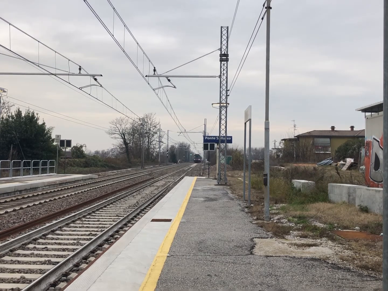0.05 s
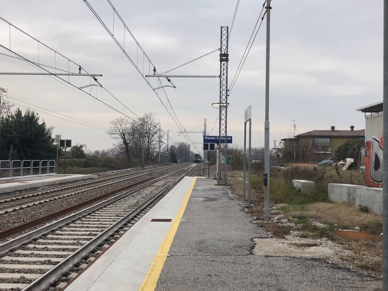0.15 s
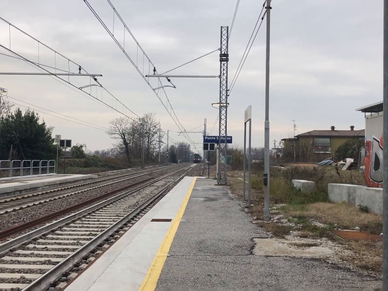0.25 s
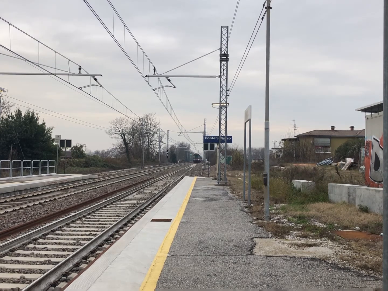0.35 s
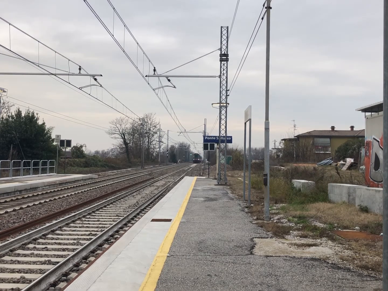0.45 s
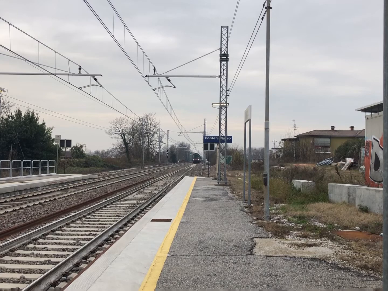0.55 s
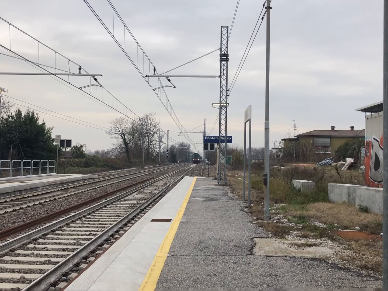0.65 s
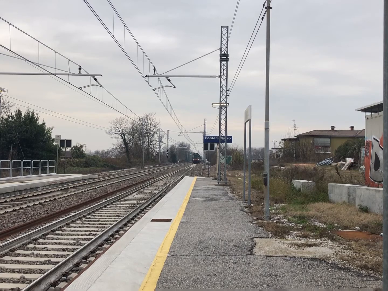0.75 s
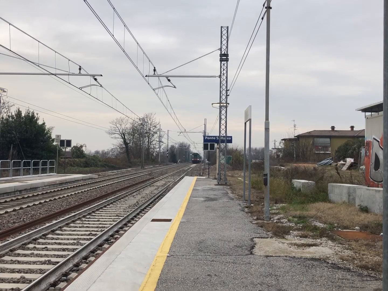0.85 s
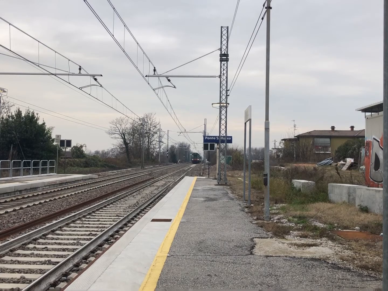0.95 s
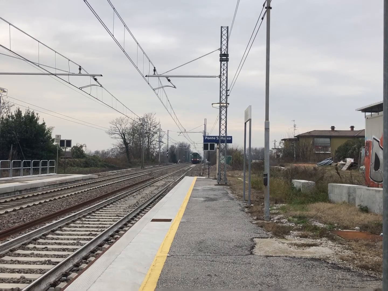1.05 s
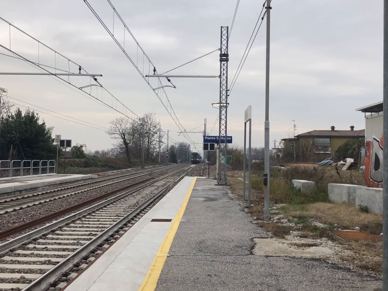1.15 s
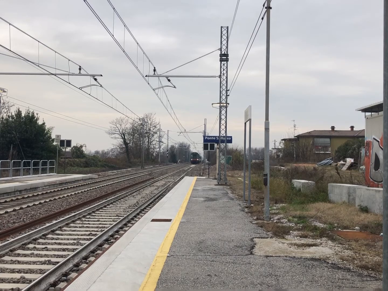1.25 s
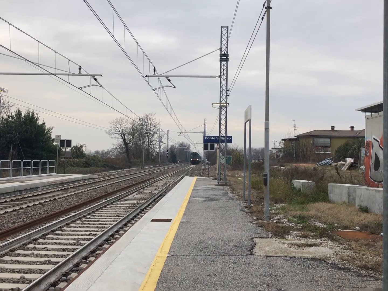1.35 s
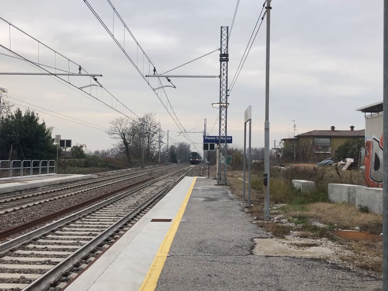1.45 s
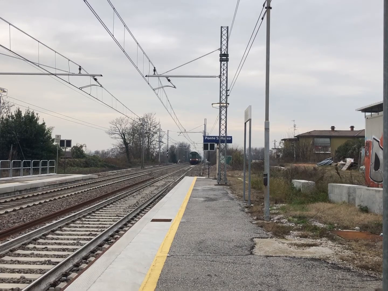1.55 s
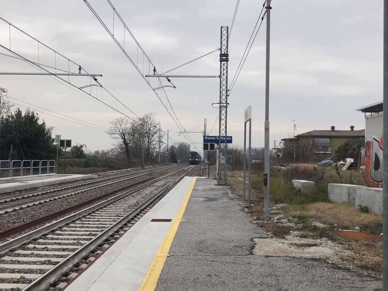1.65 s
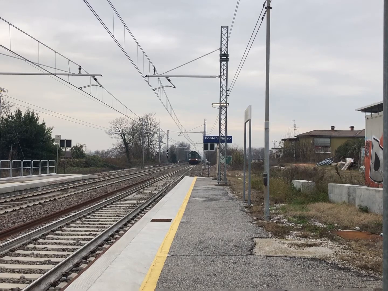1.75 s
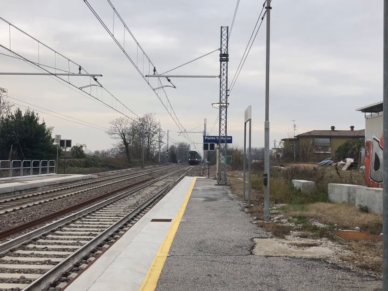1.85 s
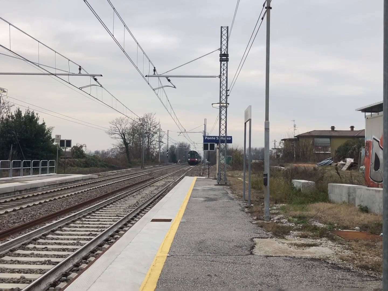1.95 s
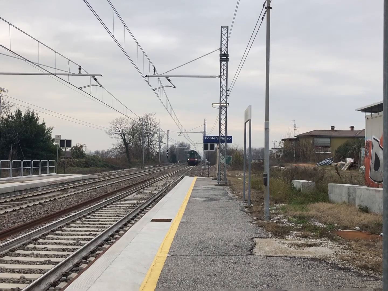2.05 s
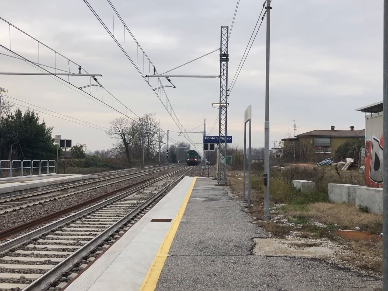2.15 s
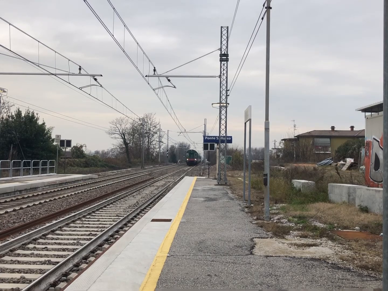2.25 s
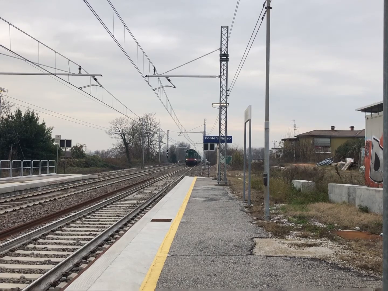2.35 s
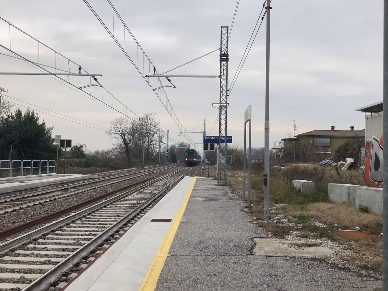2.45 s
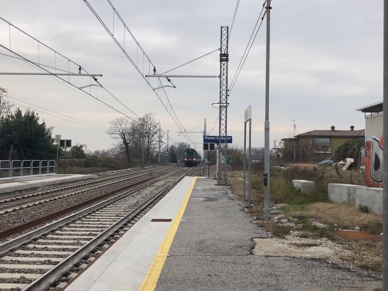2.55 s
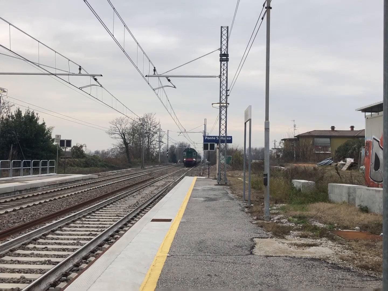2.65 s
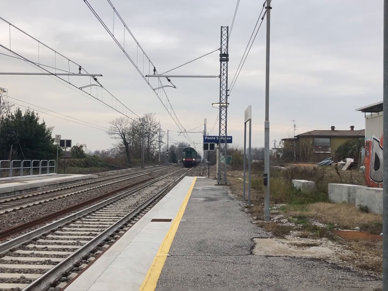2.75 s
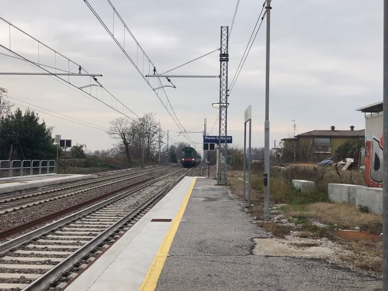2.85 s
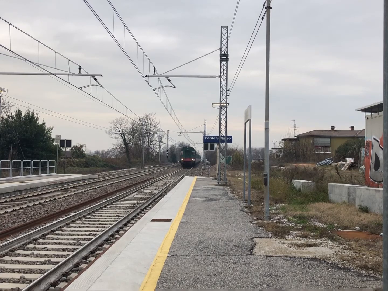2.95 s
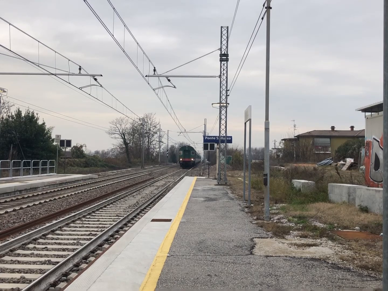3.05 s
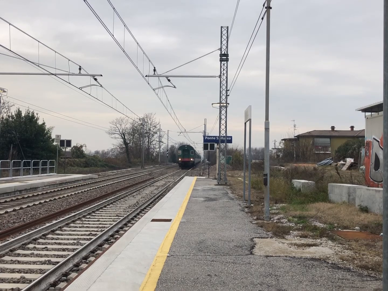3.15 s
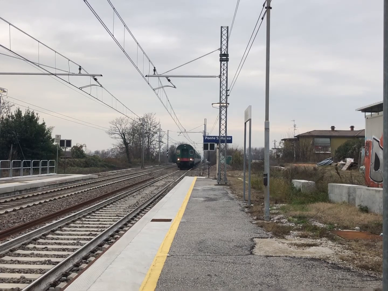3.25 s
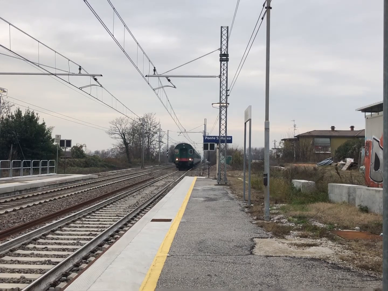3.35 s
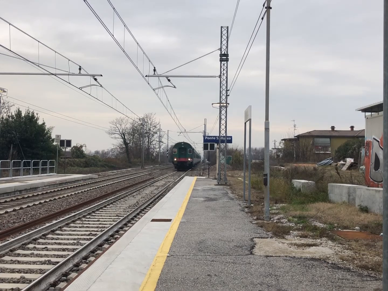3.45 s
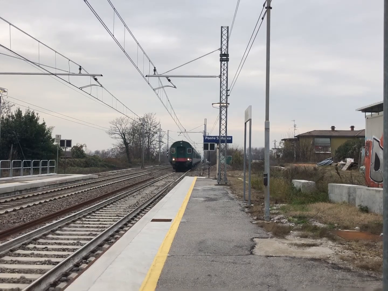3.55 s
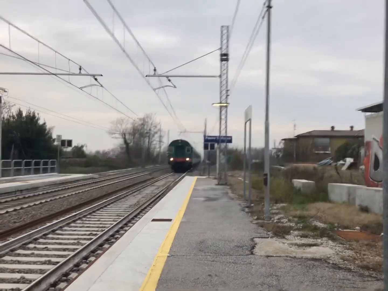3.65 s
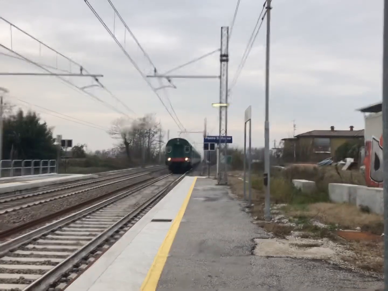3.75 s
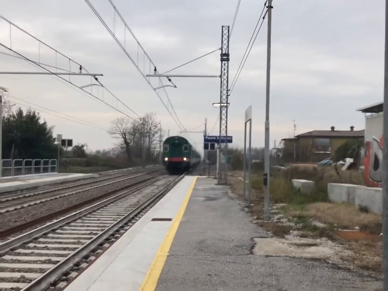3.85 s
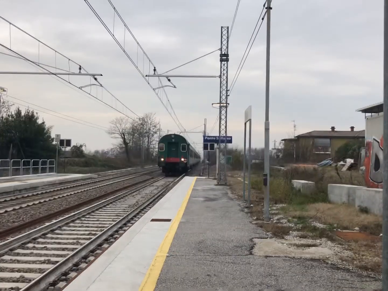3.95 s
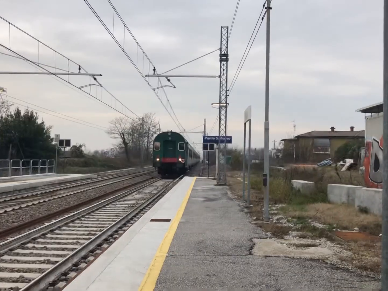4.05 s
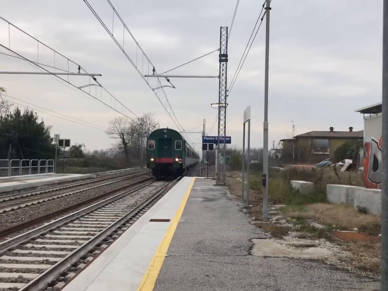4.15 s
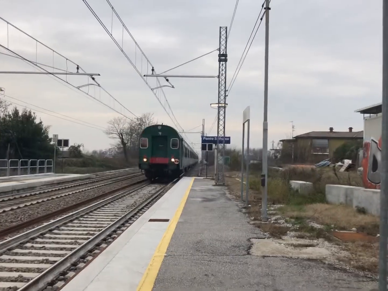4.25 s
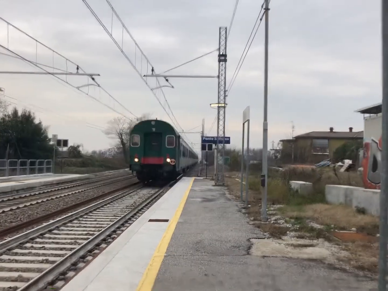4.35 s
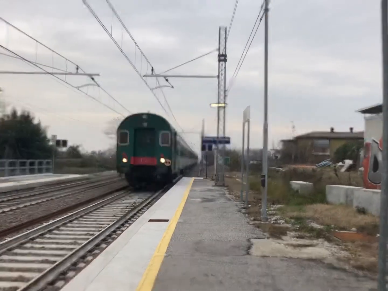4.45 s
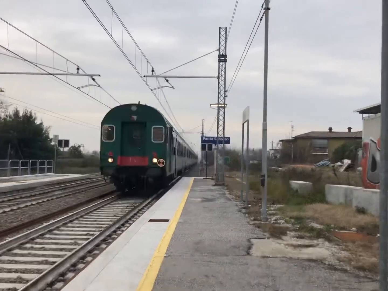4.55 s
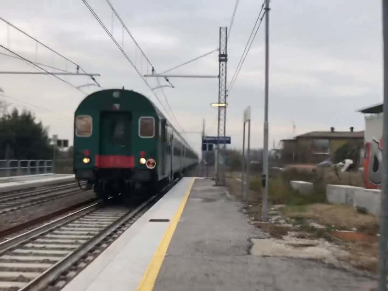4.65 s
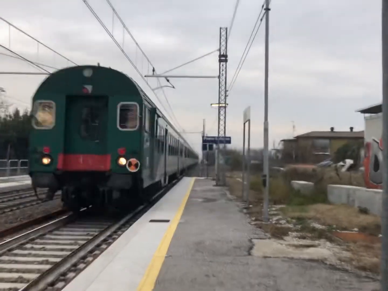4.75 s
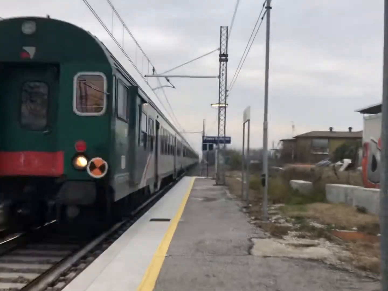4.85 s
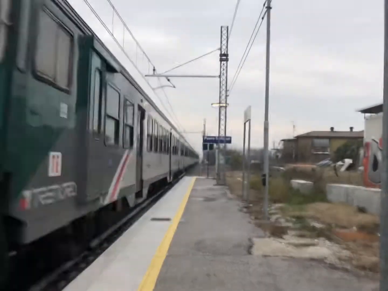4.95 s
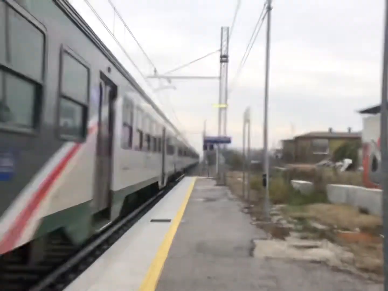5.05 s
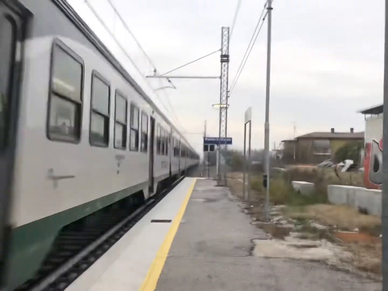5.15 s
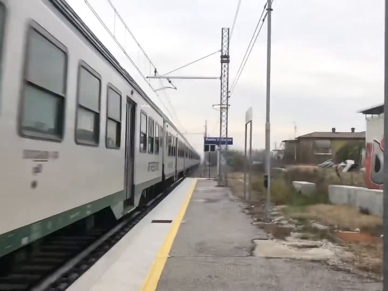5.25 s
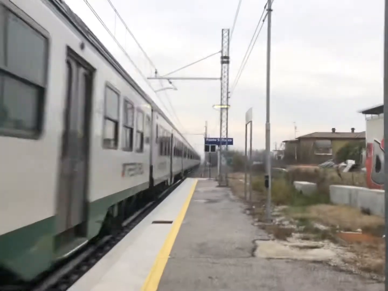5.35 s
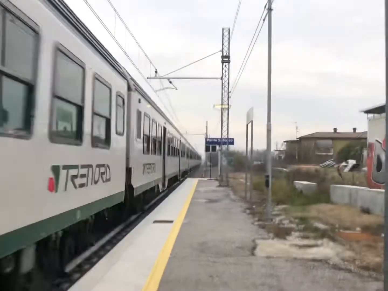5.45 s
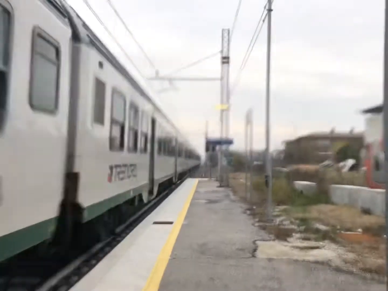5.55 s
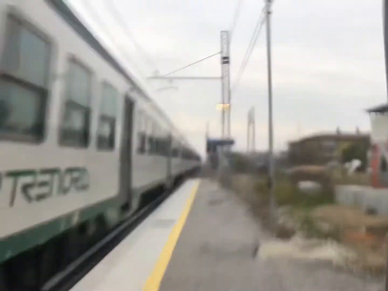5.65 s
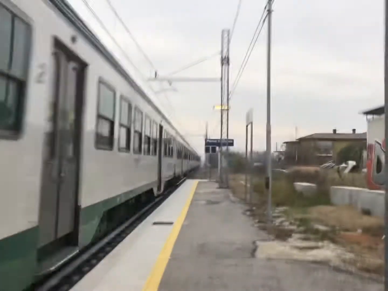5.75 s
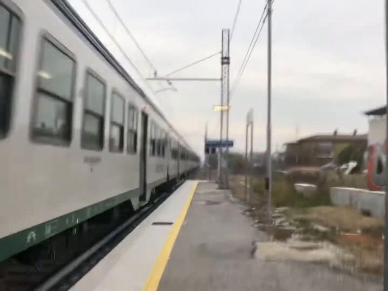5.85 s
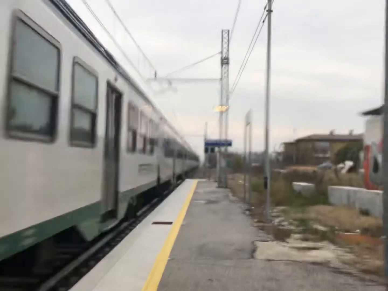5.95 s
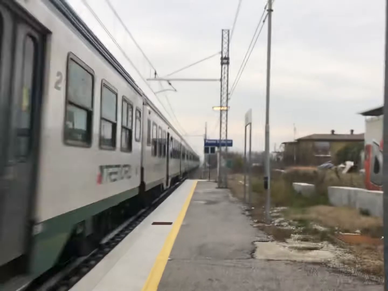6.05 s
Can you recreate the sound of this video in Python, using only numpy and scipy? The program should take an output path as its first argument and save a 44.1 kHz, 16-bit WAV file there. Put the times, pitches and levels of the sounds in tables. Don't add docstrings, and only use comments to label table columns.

```python
import sys
import numpy as np
from scipy import signal
from scipy.fft import rfft, irfft, next_fast_len
from scipy.io import wavfile
from scipy.ndimage import uniform_filter1d, minimum_filter1d, map_coordinates

SR = 44100
rng = np.random.default_rng(int(sys.argv[2]) if len(sys.argv) > 2 else 0)


def attenuation_scalar(level_db):
    decades = np.asarray(level_db, float) / 20
    return 10 ** decades


def wrap_up_sound(samples):
    columns = np.atleast_2d(samples).T
    tamed = np.clip(columns, -1, 1)
    steps = np.round(tamed * 32767).astype(np.int16)
    wavfile.write(sys.argv[1], SR, steps)


N = 269010

SPEED_MPS, ARRIVES_S, BESIDE_M = 30.7, 4.937, 4.11

# (time [s], level [dB])
GAIN_CONTROL = [(4.904, -1), (4.935, -10), (4.954, -3.5), (5, -9), (5.12, -8), (5.208, -11), (5.24, -7),
                (5.36, -7.5), (5.428, -5), (5.46, -15), (5.906, -24), (6.1, -18)]
# (frequency [Hz], level [dB per Hz])
TOWN_COLOUR = [(35, -8), (60, -2), (129, -6.5), (226, -15), (433, -13), (629, -19.5), (674, -20),
               (2160, -27), (2310, -19.5), (4980, -28.5), (6900, -74.5), (9330, -69), (15600, -45)]
# (frequency [Hz], width [Hz], level [dB])
LINE_WHISTLE = [(9610, 50, 0), (9900, 250, -28)]
# (frequency [Hz], level [dB per Hz])
DRONE_COLOUR = [(15, -50), (32, -30), (42, -7), (55, 6), (100, 4), (150, -13.5), (300, -54)]
# (time [s], swell [dB])
DRONE_SURGES = [
    (.6, 4),
    (1.6, 2.5),
    (2.1, 4.1),
    (3.1, 3),
    (4.2, 3.6),
    (4.95, 8.6),
]
# (time [s], frequency [Hz], level [dB])
MOTOR_HUM = [(2.4, 860, -77), (2.9, 854, -52), (3.5, 856, -46.5), (4, 853, -40), (4.3, 850, -35),
             (4.6, 870, -70)]
# (time [s], level [dB])
GEAR_SWELL = [(3.8, -77), (4.3, -40), (4.82, -22.5), (4.93, -35), (5, -25), (5.1, -19), (5.3, -32),
              (5.45, -23.5), (5.5, -60)]
# (time [s], peak [dB], ring frequency [Hz])
JOINT_KNOCKS = [
    (4.073, -11.5, 1140),
    (4.11, -10, 1166),
    (4.156, -13, 1042),
    (4.267, -10, 923),
    (4.28, -1.5, 1030),
    (4.332, -2, 1003),
    (4.348, -10, 1047),
    (4.394, -8, 827),
]
# (frequency [Hz], width [Hz], level [dB])
RAIL_MODES = [(925, 15, -5), (1000, 30, -6), (1045, 25, -3), (1140, 25, 0), (1205, 30, -.5), (1240, 20, -3),
              (1287, 25, 0), (1320, 20, -3), (1360, 12, 5), (1430, 12, -5), (2050, 30, -9)]
# (frequency [Hz], width [Hz], level [dB])
RAIL_LOW_MODES = [(630, 20, -9), (1047, 14, 0), (1133, 12, 2)]
# (frequency [Hz], width [Hz], level [dB])
RAIL_HEAD_MODES = [(5780, 200, 0), (7640, 150, -6), (10750, 120, -11), (11050, 400, -7), (11550, 200, -10),
                   (12330, 100, -8), (12560, 90, -3), (12790, 90, 0), (13020, 90, -3), (13600, 800, -8),
                   (14300, 100, -5), (14560, 90, -1), (14800, 120, 0), (15480, 250, -4)]
# (time [s], swell [dB], swell of the lower modes [dB])
SONG_THROBS = [(0, 6, 5), (.75, 3.5, 9.5), (1.6, 3.5, 11), (2, 3, -3), (2.3, -2, 6), (2.6, 1.5, -6),
               (2.95, -2.5, 6), (3.35, 2.5, -9), (4, -3, 1), (4.15, 2, 9), (4.3, 4.5, -1), (4.5, -2, -7),
               (4.7, 14, 0)]
# (time [s], length [s], buffet [dB], flutter over the buffet [dB])
WIND_GUSTS = [
    (4.87, .02, -11, -14),
    (4.936, 0.11, -14, -5.5),
    (5.12, .095, -7.5, -3.5),
    (5.225, 0.027, -16.5, -7),
    (5.429, 0.046, -9, -4),
    (5.484, 0.12, -8.5, -11),
    (5.635, .04, -5.5, -17),
    (5.684, 0.099, -12.5, -10),
    (5.79, 0.094, -17, -4),
    (5.912, 0.038, -30, -18),
]
# (time [s], peak [dB], snap [dB])
PORT_EDDIES = [(4.919, 1.5, -20), (4.954, -9, -28), (5.005, -3, -29), (5.047, -5, -21.5), (5.066, -8, -25),
               (5.084, -8, -24), (5.12, 0, -29), (5.181, -8, -24), (5.192, -1, -30), (5.438, -2, -25),
               (5.456, -0.5, -19), (5.474, -3, -22), (5.51, -10, -26), (5.535, 4.5, -21), (5.561, -3, -25),
               (5.58, -11, -29), (5.607, -7.5, -26), (5.62, 3, -20), (5.646, -7.5, -21.5), (5.656, -4, -22),
               (5.687, -4, -24), (5.704, -6.5, -20.5), (5.723, 2, -19.5), (5.741, -0.5, -21),
               (5.764, -0.5, -27), (5.78, 1, -32), (5.802, -12.5, -40), (5.857, -7, -34), (5.88, -11, -40)]
# (frequency [Hz], level [dB per Hz])
BUFFET_COLOUR = [(12, -43), (20, -7.5), (92, 1), (248, -7.5), (334, -17.5), (372, -19), (443, -18.5),
                 (500, -17.5), (650, -63), (1100, -120)]
FLUTTER_COLOUR = [(180, -15.5), (300, 1.5), (334, -2), (566, -5), (826, -6), (1260, -12), (1560, -15),
                  (5000, -53.5), (6500, -58), (11000, -120)]
SNAP_COLOUR = [(800, -40), (2000, 5.5), (3000, 0.5), (5000, -13), (8000, -19), (14000, -29)]
# (frequency [Hz], width [Hz], level [dB])
WHEEL_MODES = [(1737, 167, 0), (1940, 175, 2), (2264, 254, -2), (2928, 140, -2.5), (3240, 800, -10)]
# (frequency [Hz], level [dB per Hz])
RUMBLE_COLOUR = [(65, -37), (110, -7.5), (172, -3), (220, -1.5), (399, -10), (646, -8.5), (966, -10.5),
                 (1170, -9), (1600, -15.5), (2080, -73), (3520, -120)]
HISS_NEAR = [(1470, -66), (2500, -1), (2730, 3.5), (2990, -7), (4250, -3.5), (6090, -3), (8000, -24.5),
             (10400, -47), (17600, -120)]
HISS_FAR_OFF = [(1470, -40), (2500, 8.5), (2890, 2), (3990, 4.5), (4370, 0), (5890, 0), (9000, -25.5),
                (11700, -46), (19800, -120)]
RUSH_NEAR = [(4120, -27), (7000, 1.5), (7590, -2), (11400, -4.5), (13000, -8), (15600, -6.5)]
RUSH_FAR_OFF = [(4120, -26), (7000, -0.5), (9500, -3.5), (11100, -4), (12200, -8), (14900, -17),
                (15600, -15)]
# (time [s], width [s], treble [dB], rumble [dB])
WALL_ECHOES = [
    (3.33, 0.082, 1, -1),
    (3.8, .12, 1, 1),
    (4.08, 0.14, 4, 4.5),
    (4.2, .04, 2, 1),
    (4.4, 0.11, 1, 4),
    (4.6, .08, 0, 3),
    (4.86, 0.043, 0, -2),
    (5.35, 0.085, -3.5, -2.5),
]


def unit(x):
    return x / np.sqrt(np.mean(x ** 2) + 1e-20)


def curves(rows):
    s, *columns = np.transpose(rows)
    return [np.interp(np.arange(N) / SR, s, column) for column in columns]


def swells(rows, width_s):
    s, *columns = np.transpose(rows)
    offset = np.arange(N) / SR - s[:, None]
    bells = np.exp(-(offset / np.reshape(width_s, (-1, 1))) ** 2)
    return [column @ bells for column in columns]


def wobble(rate):
    knots = rng.standard_normal(int(N * rate / SR) + 4)
    return map_coordinates(knots, [np.arange(N) * rate / SR])


def sloped(points):
    f, db = np.transpose(points)
    return lambda hz: attenuation_scalar(np.interp(np.log(hz + 1), np.log(f + 1), db))


def resonant(modes):
    def response(f):
        total = 0
        for k, (centre, width, db) in enumerate(modes):
            total = total + (-1) ** k * attenuation_scalar(db) * 1j * f * width / (centre * centre - f * f + 1j * f * width)
        return total
    return response


def peaked(modes):
    return lambda f: np.sqrt(sum(attenuation_scalar(2 * db) / (1 + np.abs(2 * (f - c) / w) ** 3.9) for c, w, db in modes))


def coloured(x, response):
    m = next_fast_len(N + 8192)
    return irfft(rfft(x, m) * response(np.fft.rfftfreq(m, 1 / SR)), m)[..., :N]


def noise(response, patchy_db):
    z = signal.stft(rng.standard_normal(N + 512), nperseg=512)[2]
    patches = uniform_filter1d(rng.standard_normal(z.shape), size=6, axis=0)
    patches = unit(uniform_filter1d(patches, size=10, axis=1))
    patchy = signal.istft(z * attenuation_scalar(patchy_db * patches), nperseg=512)[1][:N]
    return unit(coloured(patchy, response))


def evened(x, share, size):
    power = np.abs(uniform_filter1d(x ** 2, size=size) + .02)
    return unit(x / power ** (share / 2))


def heard(db_at_60m, growth, loss_db_per_m):
    ahead = SPEED_MPS * np.clip(ARRIVES_S - np.arange(N) / SR, 0, None)
    r = np.hypot(ahead, BESIDE_M)
    return db_at_60m - growth * 20 * np.log10(r / 60) - loss_db_per_m * (r - 60) + curves(GAIN_CONTROL)[0]


def town():
    return attenuation_scalar(-49.0 + 0.39 * wobble(5.12)) * noise(sloped(TOWN_COLOUR), patchy_db=1.5)


def overhead_line():
    whistle = evened(noise(peaked(LINE_WHISTLE), patchy_db=0.0), share=0.46, size=1500)
    rise_db = 1.3 * np.arange(N) / SR
    return attenuation_scalar(-68 + rise_db + 2.5 * wobble(30.1) + curves(GAIN_CONTROL)[0]) * whistle


def ground_drone():
    level_db = heard(-40.5, growth=0.62, loss_db_per_m=0.11) + swells(DRONE_SURGES, width_s=0.13)[0]
    return attenuation_scalar(level_db) * evened(noise(sloped(DRONE_COLOUR), patchy_db=1.0), share=.3, size=4000)


def motor_hum():
    hz, db = curves(MOTOR_HUM)
    turn = 2 * np.pi * np.cumsum(hz + 3 * wobble(20)) / SR
    return attenuation_scalar(db + 1.2 + 2.6 * wobble(14)) * np.sin(turn)


def gear_whine():
    gear_hz, level_s, beside_m, sound_mps = 1875, 4.99, 2.5, 343
    ahead = SPEED_MPS * (level_s - np.arange(N) / SR)
    hz = gear_hz / (1 - SPEED_MPS * ahead / np.hypot(ahead, beside_m) / sound_mps)
    turn = 2 * np.pi * np.cumsum(hz) / SR
    band = wobble(260) * np.cos(turn) + wobble(260) * np.sin(turn)
    return attenuation_scalar(curves(GEAR_SWELL)[0]) * band


def rail_joint():
    out, t = np.zeros(N + SR), np.arange(SR // 10) / SR
    for s, db, hz in JOINT_KNOCKS:
        ring = np.sin(2 * np.pi * hz * t)
        ring += 0.35 * np.sin(2 * np.pi * 1.09 * hz * t)
        ring += 0.54 * np.sin(2 * np.pi * 0.76 * hz * t)
        fade = attenuation_scalar(db - 4.5 - 60 * t / 0.056)
        out[round(s * SR):][:len(t)] += fade * (1 - np.exp(-t / 0.003)) * ring
    return out[:N]


def singing_rails():
    handover_s, dies_db_per_s = 4.31, 47
    ahead_s = handover_s - np.arange(N) / SR
    throb_db, throb_low_db = swells(SONG_THROBS, width_s=0.09)
    carried_db = np.minimum(-0.16 * SPEED_MPS * ahead_s, dies_db_per_s * ahead_s)
    song_db = -31.5 + throb_db + carried_db
    low_db = -0.5 + throb_low_db - .11 * SPEED_MPS * np.clip(ahead_s, 0, None)

    def steep(hz):
        return resonant(RAIL_MODES)(hz) / (1 + (hz / 2300) ** 4) / (1 + (700 / (hz + 1)) ** 4)

    song = noise(steep, patchy_db=-1.0) + attenuation_scalar(low_db) * noise(resonant(RAIL_LOW_MODES), patchy_db=5.0)
    thin_db = -62.5 + 0.5 * (song_db - .7 * throb_db + 46.5) + 0.54 * wobble(20)
    thin = attenuation_scalar(thin_db) * noise(peaked(RAIL_HEAD_MODES), patchy_db=0.5)
    return attenuation_scalar(song_db - 2.0 + 0.98 * wobble(22.14)) * song + thin


def slipstream():
    start, length, push_db, over_db = np.transpose(WIND_GUSTS)
    since = np.arange(N) / SR - start[:, None]
    rise = np.clip(since / .02, 0, 1) ** 2
    shape = rise * attenuation_scalar(-598 * np.clip(since - length[:, None], 0, None))
    buffet = evened(noise(sloped(BUFFET_COLOUR), patchy_db=0.5), share=0.25, size=900)
    flutter = unit(attenuation_scalar(4.2 * wobble(260)) * noise(sloped(FLUTTER_COLOUR), patchy_db=3))
    gusts = attenuation_scalar(push_db + 1) @ shape * buffet
    gusts += attenuation_scalar(push_db + over_db - 1.0) @ shape * flutter

    t = np.arange(SR // 10) / SR

    def puff(rise_s):
        return (t / rise_s * np.exp(1 - t / rise_s)) ** 1.97

    tears, snaps = np.zeros(N + SR), np.zeros(N + SR)
    for s, db, snap_db in PORT_EDDIES:
        tears[round((s - .003) * SR):][:len(t)] += attenuation_scalar(db - 2.5) * puff(rise_s=0.0049)
        snaps[round(s * SR):][:len(t)] += attenuation_scalar(snap_db + 2.5) * puff(rise_s=0.0015)
    tear = evened(noise(sloped(FLUTTER_COLOUR), patchy_db=1), share=0.68, size=90)
    snap = evened(noise(sloped(SNAP_COLOUR), patchy_db=1), share=.7, size=60)
    return gusts + tears[:N] * tear + snaps[:N] * snap


def wheels():
    t = np.arange(N) / SR
    hidden = np.clip((2.725 - t) / .04 + .5, 0, 1)
    gap_start_s, gap_end_s, gap_db = 5.125, 5.25, -6.5
    gap = np.clip((t - gap_start_s) / .01, 0, 1) * np.clip((gap_end_s - t) / 0.064 + 1, 0, 1)
    behind = np.clip((t - gap_start_s) / .1, 0, 1)
    _, echo_db, boom_db = swells(WALL_ECHOES, width_s=np.transpose(WALL_ECHOES)[1])
    shared_db = .5 * wobble(12) + .5 * wobble(35)
    near = np.interp(t, (3.46, 5.1), [0, np.pi / 2])

    def blend(far, close):
        far_part = np.cos(near) * noise(sloped(far), patchy_db=1)
        return far_part + np.sin(near) * noise(sloped(close), patchy_db=1.5)

    def steep(hz):
        return resonant(WHEEL_MODES)(hz) / (1 + (hz / 4200) ** 4) / (1 + (1300 / (hz + 1)) ** 4)

    rumble_db = heard(-39, growth=1.22, loss_db_per_m=0.041) + boom_db + 0.52 * gap_db * gap - 4.5 * behind
    ring_db = heard(-43, growth=1.084, loss_db_per_m=0.049) + 0.68 * echo_db + .7 * gap_db * gap - behind
    hiss_db = heard(-45, growth=0.99, loss_db_per_m=0.055) + echo_db + gap_db * gap - 5.5 * hidden
    rush_db = heard(-51.5, growth=1.044, loss_db_per_m=0.083) + 0.83 * echo_db - 1.5 * behind - 7.5 * hidden
    rumble = attenuation_scalar(rumble_db) * noise(sloped(RUMBLE_COLOUR), patchy_db=0.5)
    ring = attenuation_scalar(ring_db) * noise(steep, patchy_db=0.0)
    hiss = attenuation_scalar(hiss_db) * blend(HISS_FAR_OFF, HISS_NEAR)
    rush = attenuation_scalar(rush_db) * blend(RUSH_FAR_OFF, RUSH_NEAR)
    return attenuation_scalar(shared_db) * (rumble + ring + hiss + rush)


def scene():
    background = town() + overhead_line()
    track = ground_drone() + rail_joint() + singing_rails()
    train = motor_hum() + gear_whine() + wheels()
    return (background + track + train + slipstream())[None]


def band_limit(x):
    return signal.sosfilt(signal.butter(12, 15720, fs=SR, output="sos"), x)


def record(dry):
    x = coloured(dry, lambda hz: 1 / (1 - (40 / (hz + .1)) ** 2 - 1.4j * 40 / (hz + .1)))
    need = np.minimum(1, .93 / (np.abs(x) + 1e-9))
    gain = uniform_filter1d(minimum_filter1d(need, size=265), size=221)
    held = coloured(x * gain, lambda hz: hz < 15730)
    return band_limit(held)


dry = scene()
out = record(dry)
wrap_up_sound(out)
```